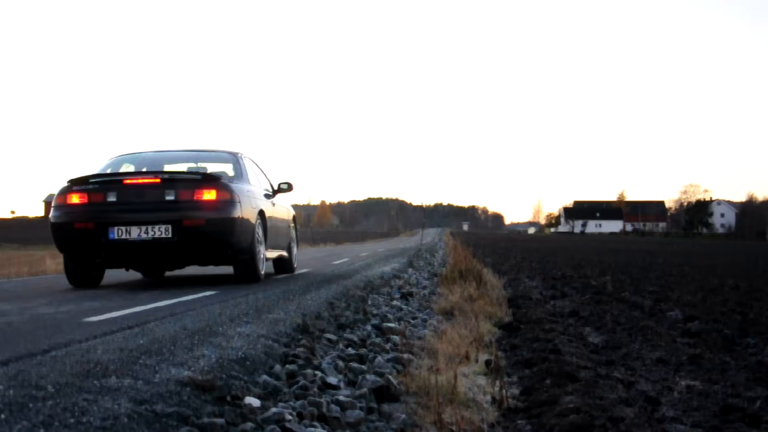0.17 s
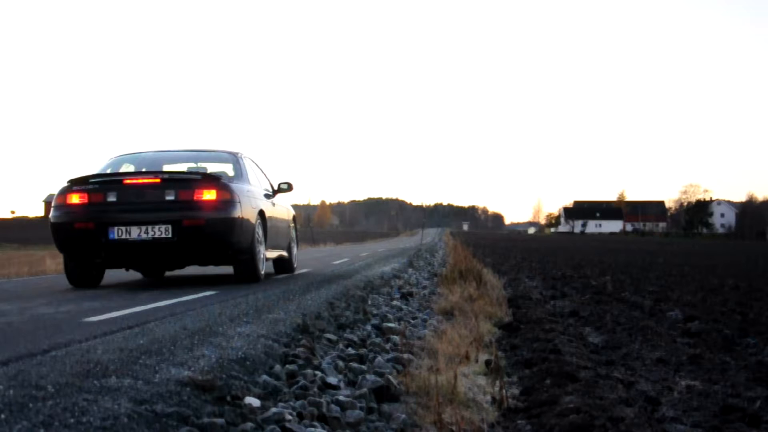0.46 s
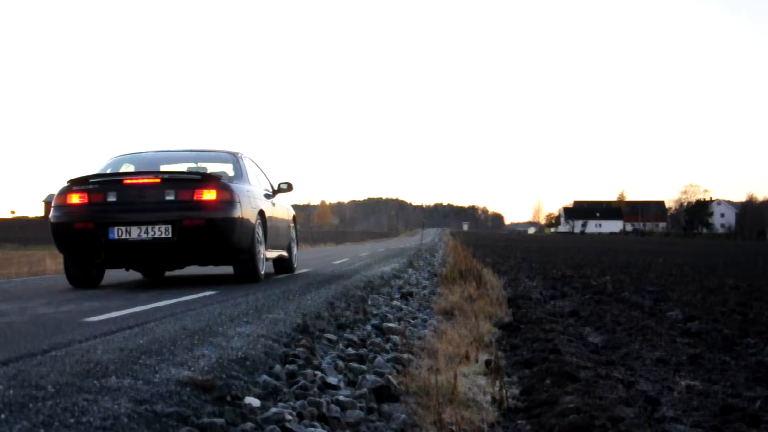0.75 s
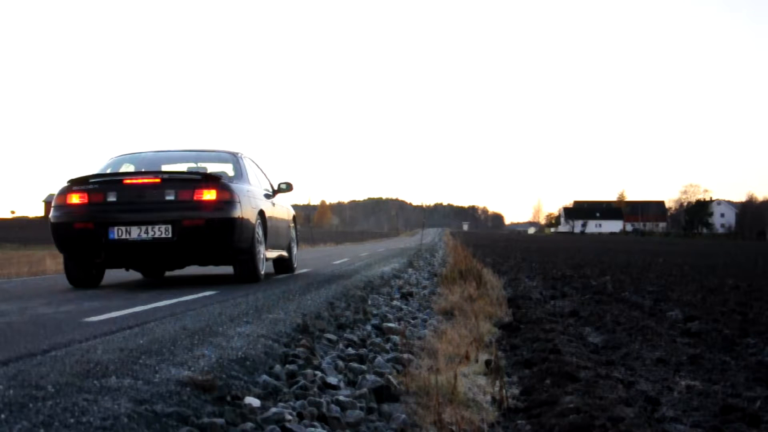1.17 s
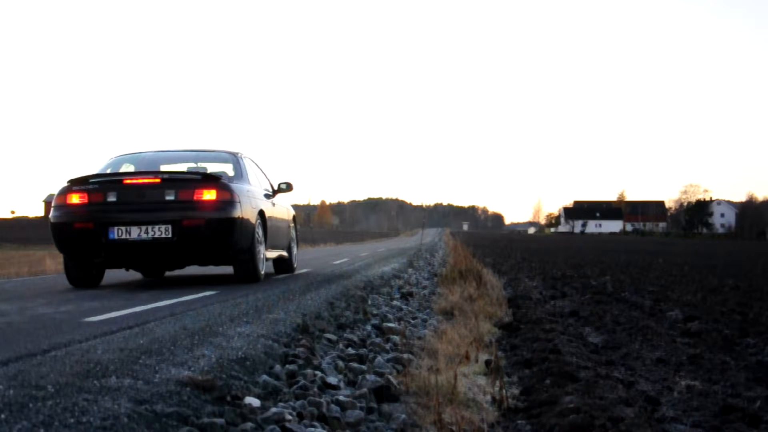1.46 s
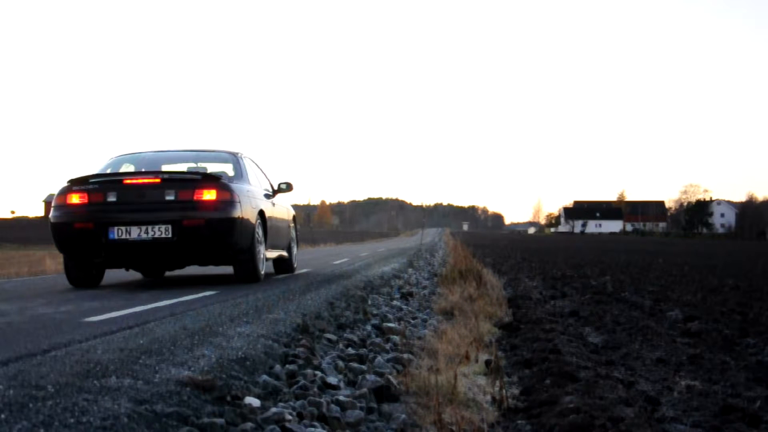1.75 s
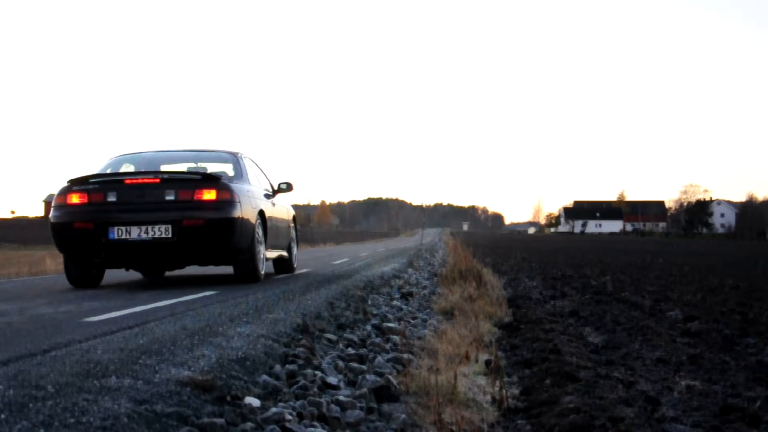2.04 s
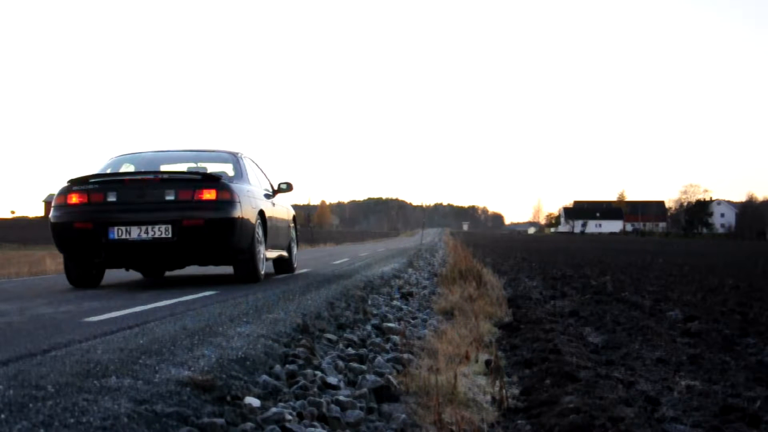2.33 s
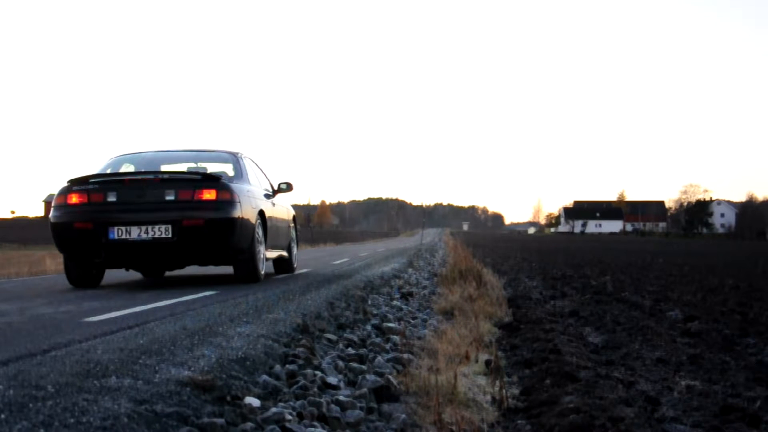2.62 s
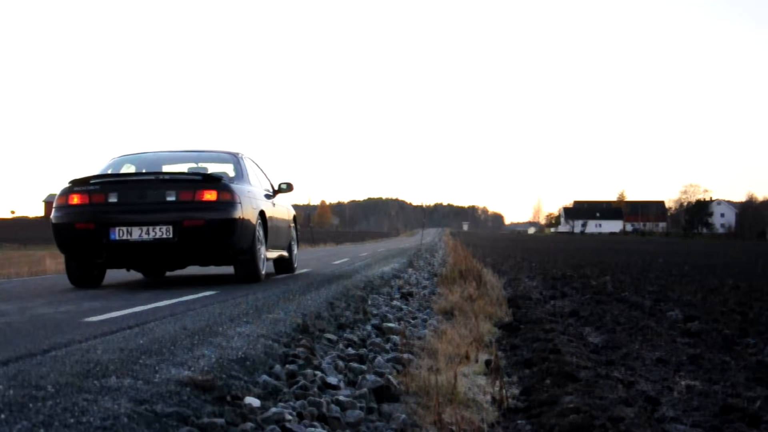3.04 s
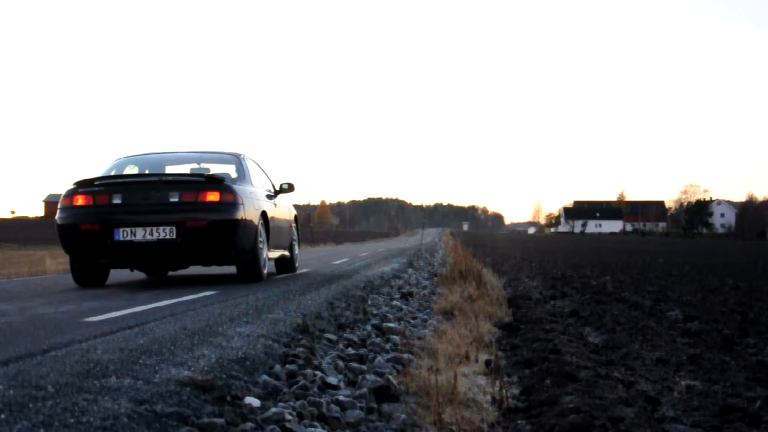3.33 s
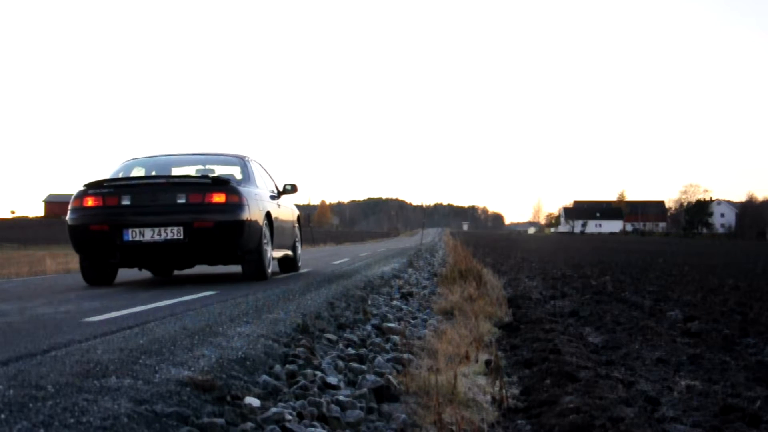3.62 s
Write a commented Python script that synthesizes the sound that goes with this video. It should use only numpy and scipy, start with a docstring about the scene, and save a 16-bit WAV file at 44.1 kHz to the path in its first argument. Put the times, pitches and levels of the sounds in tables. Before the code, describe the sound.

A car engine idles outdoors, heard a few metres behind the tailpipe: after about 0.1 s of silence, steady low exhaust thumps and dull clatter. Light metallic clunks come near 1.1, 1.25 and 1.6 s, a very faint one near 2.45. From 2.5 s it revs quickly, growling, barking and rasping with a brighter whirr and thin metallic rubbing, peaks around 3.2-3.4 s, then sags slightly until the abrupt end near 3.8.

```python
"""Car idling, then pulling away

A four-cylinder car idles on a country road, heard from a few metres behind its tailpipe.
A few light metallic clunks come from it, probably as a gear is taken: short noise with ringing tones.
Then it pulls away: the engine revs up and sags a little. Its clatter and whirr are shaped noise.
Each firing sends a thump and a puff of gas down the exhaust; hard firings also bark."""
import sys
import numpy as np
from scipy import signal
from scipy.fft import rfft, irfft, next_fast_len
from scipy.io import wavfile

SR = 44100
rng = np.random.default_rng(int(sys.argv[2]) if len(sys.argv) > 2 else 0)


def to_wav(sig):
    """Store sig (one row per channel, or 1-D mono) as 16-bit WAV at the path in sys.argv[1].

    Samples outside -1..1 are clipped; the rate is SR.
    """
    pcm = np.clip(np.atleast_2d(sig), -1, 1) * 32767
    pcm = np.round(pcm).astype(np.int16)
    wavfile.write(sys.argv[1], SR, pcm.T)  # frames by channels


N = 167139
T = np.arange(N) / SR
CYLINDERS = 4


def from_db(db):
    """Decibels to gain."""
    return 10 ** (np.asarray(db) / 20)


def rms_one(x):
    """Scale to an rms of one."""
    return x / np.sqrt(np.mean(x ** 2) + 1e-20)


def in_time(rows):
    """Draw straight lines between a table's rows: one curve per column after the time."""
    s, *columns = np.transpose(rows)
    return [np.interp(T, s, c) for c in columns]


def colour(x, points, lean=1):
    """Filter to a spectrum at unit power gain; lean 1 puts all the response after a click, 0 is symmetric."""
    size = 2 * next_fast_len(N)
    hz, db = np.transpose(points)
    bins_hz = np.arange(size // 2 + 1) * SR / size
    gain = rms_one(from_db(np.interp(np.log(bins_hz + 1e-9), np.log(hz), db)))
    # the cepstrum's two halves set how much sound comes before and after a click
    cepstrum = irfft(np.log(gain))
    cepstrum[1:size // 2] *= 1 + lean
    cepstrum[size // 2 + 1:] *= 1 - lean
    return irfft(rfft(x, size) * np.exp(rfft(cepstrum)))[:N]


def drift(points_per_s):
    """Slow wandering: straight lines between random points of spread one."""
    points = rng.standard_normal(N // 20)
    return np.interp(T * points_per_s, np.arange(len(points)), points)


def clicks(times, sizes):
    """One click at each time."""
    out = np.zeros(N + 1)
    np.add.at(out, np.clip((times * SR).astype(int), 0, N), sizes)
    return out[:N]


def dying(x, decay_s):
    """Turn each click into an envelope that dies away."""
    return signal.lfilter([1], [1, -np.exp(-1 / (decay_s * SR))], x + 1e-18)


def fade_60db(age, t60_s):
    """A fade that drops 60 dB in t60_s."""
    return np.exp(-np.log(1000) * age / t60_s)


def resonance(x, hz, width_hz):
    """A part that rings near one pitch: a two-pole band-pass."""
    r = np.exp(-np.pi * width_hz / SR)
    return signal.lfilter([1, 0, -1], [1, -2 * r * np.cos(2 * np.pi * hz / SR), r * r], x)


def sing(modes):
    """Noise sets narrow resonances ringing, each filtered twice."""
    x = rng.standard_normal(N)
    out = 0
    for hz, width_hz, db in modes:
        ringing = resonance(resonance(x, hz, width_hz), hz, width_hz)
        out = out + from_db(db) * rms_one(ringing)
    return out


# drivetrain clunks: start_s, level_db, attack_s (time constant), treble_edge_hz
CLUNK_EVENTS = [(1.132, -42.5, .004, 2500), (1.2488, -39, .0006, 6500), (1.622, -47.5, .002, 5000),
                (1.647, -44.5, .002, 2500), (2.452, -53.5, .003, 9000)]
# colour of a clunk's rattle: pitch_hz, relative_level_db (per Hz)
CLUNK_COLOUR = [(500, -22), (1400, 6), (2100, -2), (2500, -3.5), (3000, -1.5), (3400, -9), (4400, -10.5),
                (5500, -20), (6600, -26), (8200, -28.5), (10000, -61)]
# ringing tones of a clunk: pitch_hz, relative_level_db, t60_s (time to fall 60 dB)
CLUNK_TONES = [(1540, 4, 0.11), (1980, -1.5, 0.06), (2200, -1, .09), (3010, -1, 0.07)]
CLUNK_T60_S, CLUNK_RING_DB = .115, -3   # fade of the rattle; gain on all the ringing tones


def clunks():
    """Metal parts knock together: a short noisy rattle plus a few fading tones."""
    out = 0
    for start_s, level_db, attack_s, edge_hz in CLUNK_EVENTS:
        age = np.maximum(T - start_s, 0)
        burst = rng.standard_normal(N) * fade_60db(age, CLUNK_T60_S) * (age > 0)
        rattle = colour(burst, CLUNK_COLOUR)
        ring = 0
        for hz, tone_db, t60_s in CLUNK_TONES:
            tone = fade_60db(age, t60_s) * np.sin(2 * np.pi * hz * age)
            ring = ring + from_db(CLUNK_RING_DB + tone_db) * tone
        struck = (rattle + ring) * (1 - np.exp(-age / attack_s))
        soften = signal.butter(2, edge_hz, fs=SR, output="sos")
        out = out + from_db(level_db) * signal.sosfilt(soften, struck + 1e-18)
    return out


KNOCK_T60_S = 0.29   # ring of the engine block
VALVE_LAG_S, VALVE_S, VALVE_DEPTH = .0035, 0.0084, 0.23   # delay, decay and strength of the valve pulses
TICKS_PER_S, TICK_SPREAD_DB, TICK_S = 110, 3, 0.0019   # stray mechanical ticks: rate, size spread, decay


def clatter(times, rate, knock_share, tick_depth):
    """Each cylinder knocks the block with its own ring, over hiss that pulses with valves and stray ticks."""
    age = T[:SR // 8]
    knocks = 0
    for k in range(CYLINDERS):
        # the same ring returns each time this cylinder fires
        ring = rng.standard_normal(len(age)) * fade_60db(age, KNOCK_T60_S)
        hits = clicks(times[k::CYLINDERS], 1) / np.sqrt(rate)
        knocks = knocks + signal.fftconvolve(hits, ring)[:N]
    # a valve pulse after each firing and after each midpoint between firings
    halfway = (times[1:] + times[:-1]) / 2
    valves = dying(clicks(np.r_[times, halfway] + VALVE_LAG_S, 0.89), VALVE_S)
    tick_sizes = from_db(TICK_SPREAD_DB * np.minimum(rng.exponential(1, N), np.pi))
    ticks = dying((rng.random(N) < TICKS_PER_S / SR) * tick_sizes, TICK_S)
    hiss = rng.standard_normal(N) * (1 + VALVE_DEPTH * valves + tick_depth * ticks)
    return np.sqrt(knock_share) * rms_one(knocks) + np.sqrt(1 - knock_share) * rms_one(hiss)


# colour of the engine noise at idle: pitch_hz, relative_level_db (per Hz)
IDLE_COLOUR = [(30, -28), (150, 2.5), (330, -5.5), (540, 0.5), (950, -1), (1300, -9.5), (1700, -16.5),
               (2200, -19.5), (2450, -25), (3100, -27), (4200, -30.5), (4900, -36), (5500, -45),
               (6300, -45.5), (7500, -56), (9500, -74)]
IDLE_HZ = 28   # firings per second at which the starting level holds
IDLE_START_DB, IDLE_DB_PER_OCTAVE, SETTLE_DB_PER_S = -38, 1.5, -0.18   # level, rise with speed, slow easing


def idle_clatter(times, rate):
    """A dull clatter that grows a little with engine speed and slowly eases."""
    level_db = IDLE_START_DB + IDLE_DB_PER_OCTAVE * np.log2(rate / IDLE_HZ) + SETTLE_DB_PER_S * T
    return from_db(level_db) * colour(clatter(times, rate, knock_share=0.068, tick_depth=.3), IDLE_COLOUR)


# thin metallic rubbing: pitch_hz, width_hz (of each filter pass), level_db (against the whirr)
RUB_TONES = [(4366, 70, -24.5), (4480, 45, -27), (6545, 30, -47), (6670, 80, -40.5)]
# the rubbing swells now and then: peak_s, half_length_s, gain_db
RUB_SWELL_EVENTS = [(3.002, .04, 6.5), (3.112, 0.017, 12), (3.301, 0.027, 4), (3.41, .04, 5),
                    (3.547, .03, 9), (3.755, 0.028, 12)]


def rubbing():
    """Metal rubs thinly: noise rings a few high resonances and swells now and then."""
    swell_db = sum(db * np.exp(-((T - s) / half_s) ** 2) for s, half_s, db in RUB_SWELL_EVENTS)
    return from_db(swell_db) * sing(RUB_TONES)


# whine of belt-driven parts: multiple (of the firing rate), level_db (against the whirr)
WHINE_TONES = [(19, -16), (20.5, -19), (26.3, -20)]


def whines(firings):
    """Belt-driven parts whine at fixed multiples of the firing rate, wandering in level and phase."""
    out = 0
    for multiple, db in WHINE_TONES:
        level_db = db + 2 * drift(points_per_s=12.8)
        phase = 2 * np.pi * multiple * firings + 0.41 * drift(points_per_s=24)
        out = out + from_db(level_db) * rms_one(np.sin(phase))
    return out


# colour of the whirr that speed adds: pitch_hz, relative_level_db (per Hz)
WHIRR_COLOUR = [(200, -15), (520, 0), (700, -6.5), (900, -2.5), (1350, -0.5), (1580, -3.5), (1760, -3.5),
                (2400, -8.5), (3300, -12.5), (4000, -15), (4400, -17.5), (4900, -20.5), (5500, -32),
                (6200, -29.5), (6700, -32), (7200, -37), (8000, -45), (9500, -50.5)]
# engine parts that sing as speed rises: pitch_hz, width_hz (of each filter pass), level_db (against the whirr)
SINGING_PARTS = [(830, 50, -14), (1030, 25, -19), (1611, 24, -19), (1728, 24, -15.5), (1806, 30, -19),
                 (2009, 20, -20), (2211, 18, -23), (3030, 40, -27), (3457, 22, -31), (3602, 26, -25.5),
                 (3728, 30, -30)]
# level of the whirr as the engine revs: time_s, level_db
WHIRR_CURVE = [(2.45, -72), (2.63, -58.5), (2.76, -50), (2.87, -45.5), (3.0, -43), (3.11, -40),
               (3.36, -39.5), (3.62, -40), (3.79, -41.5)]
WHIRR_THROB = 0.12   # share by which the whirr throbs with each turn of the crank


def whirr(times, rate, firings):
    """As the engine revs, a brighter whirr joins in with singing parts, thin rubbing and faint whines."""
    noise = colour(clatter(times, rate, knock_share=0.64, tick_depth=.6), WHIRR_COLOUR)
    mix = noise + sing(SINGING_PARTS) + rubbing() + whines(firings)
    throb = 1 + WHIRR_THROB * np.cos(np.pi * firings)   # two firings per turn
    return from_db(in_time(WHIRR_CURVE)[0]) * throb * mix


# turbulent gas in the pipe: pitch_hz, relative_level_db (per Hz)
RASP_COLOUR = [(25, -34.5), (60, -13), (100, -10.5), (220, 2), (300, -14), (410, 1.5), (470, -11.5),
               (700, -16.5), (1500, -28.5), (10000, -93.5)]
PUFF_S, PUFF_FLOOR = 0.012, 0.38   # decay of each puff; flow between puffs, against a puff of one


def rasp(times, sizes, rasp_db):
    """Each firing drives a puff of gas, heard as rasping noise that rises and dies with it."""
    puffs = rms_one(PUFF_FLOOR + dying(clicks(times, sizes), PUFF_S))
    return colour(from_db(rasp_db) * puffs * rng.standard_normal(N), RASP_COLOUR)


# the silencer's upper resonances: pitch_hz, width_hz, relative_level_db
BARK_TONES = [(222, 26, 0), (278, 32, -2), (345, 40, -4), (402, 36, -3.5), (500, 120, -10.5)]
# gain of the bark over time: time_s, gain_db
BARK_CURVE = [(2.6, -62), (2.95, -43), (2.99, -27), (3.1, -28.5), (3.2, -31), (3.4, -31.5), (3.55, -36),
              (3.79, -37)]
SILENCER_EDGE_HZ = 466   # the silencer swallows the bark above this


def bark(beat):
    """Hard firings ring the silencer's upper resonances, which then lose their treble."""
    ringing = 0
    for hz, width_hz, db in BARK_TONES:
        ringing = ringing + from_db(db) * rms_one(resonance(beat, hz, width_hz))
    muffle = signal.butter(4, SILENCER_EDGE_HZ, fs=SR, output="sos")
    return signal.sosfilt(muffle, rms_one(ringing)) * from_db(in_time(BARK_CURVE)[0])


# tailpipe response to a firing at idle: pitch_hz, relative_level_db
PIPE_IDLE = [(15, -43.5), (28, -25), (56, 3.5), (85, 2.5), (112, 2.5), (140, -2), (168, -1), (198, -12),
             (226, -13), (260, -32), (320, -19.5), (420, -38), (800, -26), (3000, -64), (10000, -115)]
# tailpipe response with the throttle open: pitch_hz, relative_level_db
PIPE_THROTTLE = [(15, -45), (45, -9), (65, 0.5), (87, 8), (109, 2.5), (131, 4.5), (165, -1.5), (200, -7),
                 (218, 1), (245, -13.5), (280, -20), (340, -27), (405, -28), (470, -37), (800, -35.5),
                 (3000, -69), (10000, -115)]
THUMP_LEAN = 0.65   # the valves open gradually, so a thump swells to its peak


def thumps(beat, thump_db, throttle):
    """Each firing thumps through the pipe, whose tone shifts as the throttle opens."""
    pulses = beat * from_db(thump_db)
    closed = colour(pulses * (1 - throttle), PIPE_IDLE, THUMP_LEAN)
    opened = colour(pulses * throttle, PIPE_THROTTLE, THUMP_LEAN)
    return closed + opened


# engine effort: time_s, thump_level_db, rasp_level_db
EFFORT_CURVE = [(.12, -34, -50), (2.52, -34, -53), (2.63, -28.5, -52), (2.74, -23.5, -49), (2.86, -20, -44),
                (2.96, -20, -41), (3.07, -18.5, -37), (3.22, -17.5, -38.5), (3.38, -18, -40),
                (3.55, -20.5, -41), (3.79, -22.5, -40)]
# throttle opening: time_s, share_open (0 to 1)
THROTTLE_CURVE = [(2.55, 0), (2.82, 0.88)]
# strength of each cylinder: gain_db
CYLINDER_GAINS = [0.33, 0.63, 1.2, -0.61]
# with the throttle fully open, pulses reach the tailpipe unevenly, the growl: lag_s for each cylinder
CYLINDER_LAGS = [-.00045, -.0001, .0001, .0003]
UNEVEN_DB, THUMP_LAG_S = 0.5, 0.0015   # chance from firing to firing; delay of the thump and bark


def exhaust(times, rate):
    """Every firing thumps and rasps through the tailpipe; on the throttle the beat limps and barks."""
    thump_db, rasp_db = in_time(EFFORT_CURVE)
    throttle = in_time(THROTTLE_CURVE)[0]
    times = times + np.resize(CYLINDER_LAGS, len(times)) * np.interp(times, T, throttle)
    chance_db = UNEVEN_DB * rng.standard_normal(len(times))
    sizes = from_db(np.resize(CYLINDER_GAINS, len(times)) + chance_db)
    # smaller clicks at faster rates keep the average power even
    beat = clicks(times + THUMP_LAG_S, sizes) * np.sqrt(SR / rate)
    return thumps(beat, thump_db, throttle) + bark(beat) + rasp(times, sizes, rasp_db)


# engine speed: time_s, firings_per_s
SPEED_CURVE = [(0.0, 27.66), (0.45, 27.58), (0.75, 28.14), (1.1, 28.14), (1.4, 28.04), (1.55, 27.48),
               (1.85, 28.12), (2.5, 28.08), (2.62, 30.57), (2.72, 34.53), (2.85, 43.01), (2.98, 54.55),
               (3.08, 61.62), (3.24, 67.59), (3.4, 67.97), (3.58, 62.01), (3.79, 56.0)]
ANCHOR_FIRING_S, JITTER_S = .1486, .00005   # one firing is set to this moment; random spread of every firing


def scene():
    """The engine speed sets the firing times, which drive the exhaust and the engine noise."""
    rate, = in_time(SPEED_CURVE)
    firings = np.cumsum(rate) / SR
    firings -= np.interp(ANCHOR_FIRING_S, T, firings)
    # the engine fires each time the running count passes a whole number
    times = np.interp(np.arange(np.ceil(firings[0]), firings[-1]), firings, T)
    times = times + JITTER_S * rng.standard_normal(len(times))
    engine = idle_clatter(times, rate) + whirr(times, rate, firings)
    return (clunks() + engine + exhaust(times, rate))[None]


START_S, FADE_S, CUTOFF_HZ = .1165, 0.0021, 10800   # where sound cuts in; fade at each end; top of the treble


def record(dry):
    """The sound cuts in after a moment of silence and ends in a tiny fade; the top treble is cut."""
    opened = np.clip(np.minimum(T - START_S, T[-1] - T) / FADE_S, 0, 1)
    return signal.sosfilt(signal.cheby2(10, 60, CUTOFF_HZ, fs=SR, output="sos"), dry * opened)


dry = scene()
out = record(dry)
to_wav(out)
```